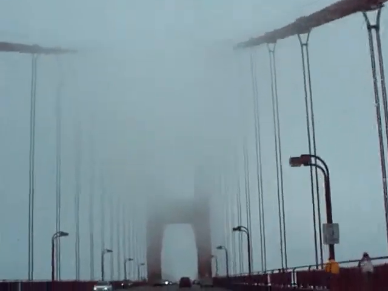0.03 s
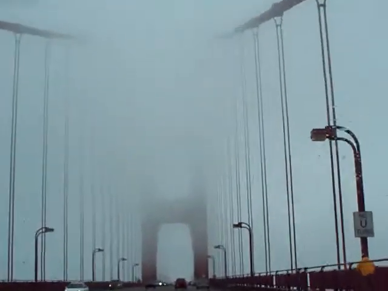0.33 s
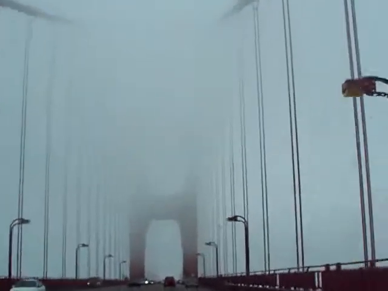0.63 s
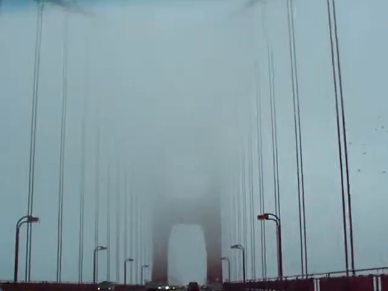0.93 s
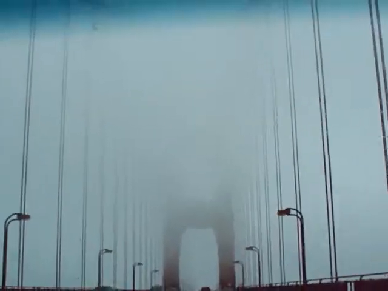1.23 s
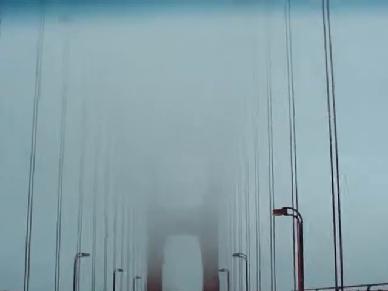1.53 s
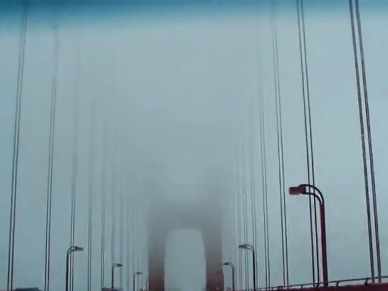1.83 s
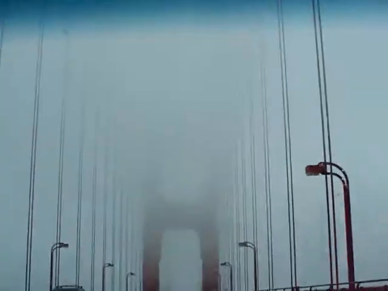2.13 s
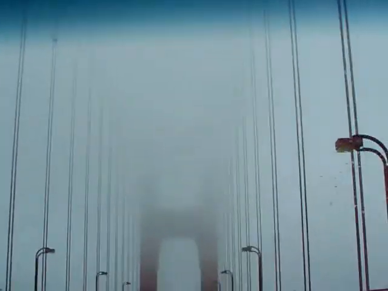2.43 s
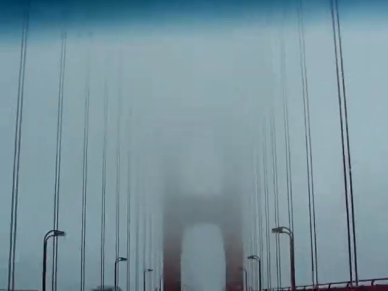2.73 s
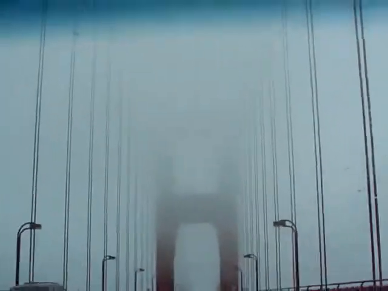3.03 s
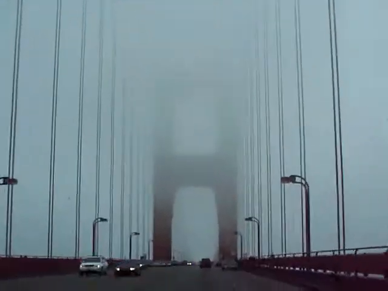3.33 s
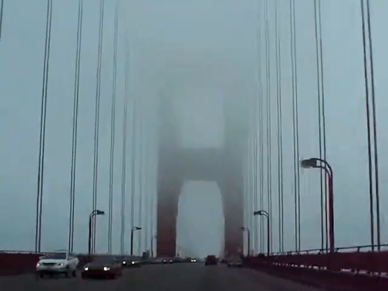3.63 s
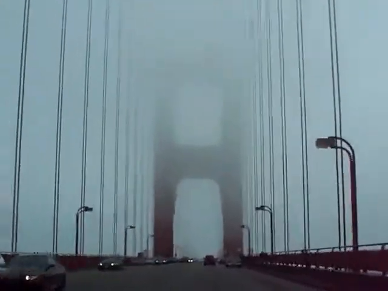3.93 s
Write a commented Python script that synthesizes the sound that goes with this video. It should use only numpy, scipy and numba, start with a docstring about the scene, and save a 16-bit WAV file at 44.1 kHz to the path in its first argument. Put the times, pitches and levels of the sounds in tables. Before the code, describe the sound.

Steady road rumble and wind are heard from inside a car driving over a bridge. Dull bumps and small, close rattles come as the noise rises, and the engine hums underneath, a little stronger toward the end.

```python
"""Tyre roar and wind fill the cabin of a car crossing a bridge at steady speed, swelling near one second.
Rough patches shake the body and thud through the suspension, and something loose ticks close by.
The engine drones underneath, and air whistles faintly through a gap. Heard from inside the cabin,
on a small camera's microphone whose gain control ducks briefly after the sharpest knocks."""
import sys
import numpy as np
from scipy import signal
from scipy.fft import rfft, irfft
from scipy.io import wavfile
from scipy.ndimage import uniform_filter1d
from numba import njit

SR = 44100
rng = np.random.default_rng(int(sys.argv[2]) if len(sys.argv) > 2 else 0)


def put_to_file(sound):
    """Save the sound as 16-bit audio at rate SR, in the file named by the first command-line argument."""
    columns = np.atleast_2d(sound).T  # one column per channel
    safe = np.clip(columns, -1, 1)
    whole_steps = np.round(safe * 32767)
    wavfile.write(sys.argv[1], SR, whole_steps.astype(np.int16))


N = 176400

# rush of tyres and wind in the cabin (t/s, level/dB)
RUSH_LEVEL = [(0, -46), (.3, -48), (.48, -45), (.68, -45), (.82, -39.5), (.96, -36.5), (1.05, -38),
              (1.11, -33.5), (1.18, -38), (1.39, -38), (1.5, -40.5), (1.75, -38), (1.95, -39), (2.015, -43),
              (2.045, -40), (2.5, -40), (2.68, -38), (2.83, -40.5), (3.1, -35), (3.25, -35), (3.35, -32),
              (3.44, -35), (3.51, -34.5), (3.58, -38.5), (4, -37.5)]


def rush():
    """Tyres and wind heard through the glass, with narrow resonances of tyres and cabin."""
    spectrum = [(200, -22.5), (450, -1.5), (620, 0), (795, 3.5), (870, -2.5), (1200, -5.5), (1420, -7),
                (1600, -8.5), (1850, -10.5), (2500, -19.5), (3100, -24.5), (3900, -38), (5000, -65.5)]  # the broad roar (f/Hz, level/dB)
    resonances = [(771, 79, -15), (1418, 42, -17), (1900, 30, -29)]  # (f/Hz, width/Hz, level/dB relative to the roar)
    roar = noise(spectrum, flicker_db=0.83)
    ringing = sum(undb(db) * ring(hz, width) for hz, width, db in resonances)
    return (roar + ringing) * undb(curve(RUSH_LEVEL))


def rumble():
    """The road rumbles up through the floor."""
    spectrum = [(20, -14), (55, -11.5), (85, -6), (140, -1), (195, -6.5), (230, 1), (260, -3.5), (305, 2),
                (400, 1), (480, -8), (650, -13.5), (1000, -22.5), (2000, -65)]  # colour of the rumble (f/Hz, level/dB)
    level = [(0, -41.5), (.68, -44.5), (.85, -36), (1.13, -35), (1.5, -39), (1.8, -37.5), (2.03, -40),
             (2.6, -36.5), (2.95, -39), (3.12, -38), (3.36, -35), (3.57, -41), (4, -36.5)]  # its swells (t/s, level/dB)
    return noise(spectrum, flicker_db=1.0) * undb(curve(level))


def bumps():
    """Each rough patch shakes the body for a moment, and the tyres slap on it."""
    patches = [(.93, -37.5, 1, -9), (1.112, -31, 0.62, 1), (1.14, -35, 1.04, 0), (1.294, -40, 1.9, -15),
               (1.44, -37, 1, -5), (1.792, -32, 1.5, -9), (1.925, -32, 0.64, -11), (2.21, -43.5, 1.2, -4),
               (2.427, -32.5, 1.7, -4), (2.655, -39.5, 1.1, -3), (2.776, -38, 0.91, -1),
               (3.075, -33, 1.05, 0.5), (3.119, -32.5, 1.7, -7), (3.2, -32.5, 1.6, -2.5),
               (3.294, -34.5, 2.4, -4.5), (3.4, -36, 0.82, -1), (3.519, -31.5, 0.86, 0),
               (3.62, -32.5, 1.2, -5), (3.721, -30.5, 1.5, -4), (3.845, -31.5, 1, -12),
               (3.974, -31, 1.1, -3)]  # (t/s, body level/dB, length factor, slap level/dB relative to the body)
    body_spectrum = [(40, -23), (90, 0.5), (130, -1.5), (190, 2), (250, 1), (300, 7), (390, 8.5), (520, -5),
                     (780, -12), (1000, -23), (2000, -50.5)]  # the body's answer to a bump (f/Hz, level/dB)
    slap_spectrum = [(300, -24.5), (550, -6), (760, 5), (950, -8.5), (1800, -13), (3500, -47.5)]  # the tyres' slap (f/Hz, level/dB)
    rise_s, fall_s = 0.01, 0.0079  # at length factor 1
    t = np.arange(N) / SR
    body_power = slap_power = 0
    for at, db, length, slap_db in patches:
        width = length * np.where(t < at, rise_s, fall_s)
        power = undb(db) ** 2 * np.exp(-((t - at) / width) ** 2)
        body_power += power
        slap_power += power * undb(slap_db) ** 2
    body = np.sqrt(body_power) * noise(body_spectrum, flicker_db=0.5)
    slap = np.sqrt(slap_power) * noise(slap_spectrum, flicker_db=0.0)
    return body + slap


def thuds():
    """The suspension takes a blow, and the cabin booms for a few cycles."""
    blows = [(1.115, -30, 137.2), (1.30, -29, 116), (1.445, -42, 148), (1.92, -35, 128)]  # (t/s, level/dB, f/Hz)
    t, half_length_s = np.arange(N) / SR, 0.019
    out = np.zeros(N)
    for at, db, hz in blows:
        envelope = undb(db) * np.exp(-((t - at) / half_length_s) ** 2)
        out += envelope * np.sin(2 * np.pi * (hz * t + rng.random()))
    return out


def add_tick(out, at, knock_db, edge_db, edge_hz, sign, rebound):
    """One tick: a dull push under a millisecond long, with a bright edge that rebounds once."""
    knock_s, edge_s, latest_rebound_s = 0.00028, 0.00015, 0.0006
    t = np.arange(-200, 200) / SR
    spread = (t / knock_s) ** 2
    knock = np.exp(-spread / 2) - np.exp(-spread / 32) / 4  # a push inside a wider, shallow pull
    snap = lambda s: np.exp(-(s / edge_s) ** 2) * np.cos(2 * np.pi * edge_hz * s)
    edge = snap(t) + undb(-7) * snap(t - latest_rebound_s * (1 + rebound) / 2)
    edge = signal.sosfiltfilt(signal.butter(6, 4200, "high", fs=SR, output="sos"), edge)
    start = int(np.clip(at * SR - len(t) // 2, 0, N - len(t)))
    out[start:start + len(t)] += sign * (undb(knock_db) * knock + undb(edge_db) * edge)


def rattle():
    """Something loose close by: clear ticks, and faint chatter that grows denser and louder with the rush."""
    ticks = [(0.736, -38, -49, 6600), (.793, -24, -49, 7100), (0.823, -19, -53, 6300),
             (.835, -22, -46, 5960), (0.854, -14.5, -43, 6000), (1.01, -16.5, -45, 6330),
             (1.086, -38, -48, 6500), (1.119, -14, -41.5, 6400), (1.135, -24, -42, 5600),
             (1.152, -14.5, -38, 6400), (1.244, -16, -40.5, 6950), (1.295, -21, -43, 5700),
             (1.303, -25, -43.5, 6200), (1.449, -14, -43.5, 6000), (1.873, -32, -42, 5400),
             (1.930, -16, -38.5, 5960), (1.975, -16.5, -41.5, 6400), (1.996, -32, -54, 6600),
             (2.027, -44, -50, 6400), (2.304, -18, -44, 7100), (2.453, -16, -46, 6850),
             (2.504, -24, -58, 5500), (2.519, -35, -39.5, 6800), (2.78, -25, -45.5, 6100),
             (2.838, -40, -49, 6700), (2.951, -30, -42, 5700), (3.002, -28, -42.5, 5450),
             (3.022, -30, -50.5, 6000), (3.246, -27, -45, 5950), (3.344, -15, -40, 7260),
             (3.378, -25, -44, 5400), (3.399, -21, -42, 7000), (3.405, -14, -39, 6200),
             (3.477, -17.5, -42, 5760), (3.536, -15, -40.5, 6600), (3.551, -29, -41, 5850),
             (3.6, -31, -44, 6700), (3.622, -16.5, -47, 6500), (3.642, -20, -40, 5600),
             (3.75, -15, -41, 5840), (3.797, -20, -41, 5700), (3.814, -36, -46, 5800),
             (3.848, -16, -43, 6900), (3.910, -23, -42, 5400), (3.982, -36, -40, 7200)]  # the clear ticks (t/s, knock level/dB, edge level/dB, edge f/Hz)
    peak_chatter_per_s, still_below_db = 45, -45.5
    out, rush_db = np.zeros(N), curve(RUSH_LEVEL)
    for tick, (side, rebound) in zip(ticks, rng.random((len(ticks), 2))):
        add_tick(out, *tick, np.sign(side - .5), rebound)
    shaking = (rush_db - still_below_db) / (rush_db.max() - still_below_db)
    for when, size, pitch, side, rebound, grip in rng.random((int(peak_chatter_per_s * N / SR), 6)):
        i = int(when * N)
        if grip < shaking[i]:
            edge_db = rush_db[i] - 12.5 + 2.5 * (2 * size - 1)
            edge_hz = 5700 * (1 + .4 * (pitch - .5))
            add_tick(out, when * N / SR, edge_db + 12, edge_db, edge_hz, np.sign(side - .5), rebound)
    return out


def engine():
    """Clean orders of the shaft rate; the third booms in the cabin, and each wavers a little."""
    shaft_rate = [(0, 39.4), (.9, 39.8), (2.3, 40.1), (3.1, 40.2), (4, 40.2)]  # turns of the shaft per second (t/s, f/Hz)
    orders = [(2, -13.5), (3, -0.5), (6, -10), (9, -9)]  # engine orders (multiple of the shaft rate, level/dB)
    level = [(0, -50), (.35, -63), (.8, -42), (1.4, -44.5), (2.0, -47), (2.8, -43), (3.15, -36.5),
             (3.5, -35), (4, -36.5)]  # the drone in the cabin (t/s, level/dB)
    turns = np.cumsum(curve(shaft_rate) * (1 + .001 * walk(6))) / SR
    drone = np.zeros(N)
    for order, db in orders:
        drone += undb(db + 1.2 * walk(12)) * np.sin(2 * np.pi * (round(order) * turns + rng.random()))
    return np.sqrt(2) * drone * undb(curve(level))


def gusts():
    """Gusts brighten the rush at the crests of its swells."""
    spectrum = [(700, -25.5), (1200, 2), (1550, 3.5), (2000, 1), (2600, -13), (3600, -25.5), (4500, -49)]  # colour of a gust (f/Hz, level/dB)
    crests = [(0.82, -47, 0.031), (0.955, -50, 0.058), (3.352, -43.5, 0.067)]  # (t/s, level/dB, half length/s)
    t = np.arange(N) / SR
    envelope = sum(undb(db) * np.exp(-((t - at) / width) ** 2 / 2) for at, db, width in crests)
    return noise(spectrum, flicker_db=2.0) * envelope


def hiss():
    """Fine wind hiss from outside the glass."""
    spectrum = [(2500, -19), (4000, -7.5), (4800, 0), (6000, 1.5), (7500, -2), (8400, -8), (9300, -15)]  # colour of the hiss (f/Hz, level/dB)
    level = [(0, -77.5), (.68, -76), (.85, -69.5), (1.13, -67.5), (1.2, -69), (1.5, -71), (1.8, -70.5),
             (2.3, -71), (2.8, -70.5), (3.1, -66.5), (3.35, -66), (3.6, -68), (4, -67.5)]  # its swells (t/s, level/dB)
    return noise(spectrum, flicker_db=1.0) * undb(curve(level))


def whistle():
    """Air through a gap: a thin, unsteady tone far in the background."""
    level = [(0, -84), (.12, -93), (.17, -82), (.44, -80), (.52, -95), (4, -110)]  # strength of the whistle (t/s, level/dB)
    return ring(hz=5850, width_hz=280) * undb(curve(level))


def undb(db):
    """Decibels to gain."""
    return 10 ** (np.asarray(db) / 20)


def curve(rows):
    """Straight lines through (t/s, value) rows."""
    return np.interp(np.arange(N) / SR, *np.array(rows, float).T)


def walk(rate):
    """Random levels held 1 / rate s and smoothed twice; spread near 1."""
    hold = max(int(SR / rate), 2)
    steps = rng.standard_normal(1024)[np.arange(N) // hold % 1024]
    return 1.3 * uniform_filter1d(uniform_filter1d(steps, hold), hold)


def noise(colour, flicker_db):
    """Noise of rms 1, shaped by (f/Hz, level/dB) rows; each octave flickers on its own."""
    octave = np.log2(np.maximum(np.arange(N // 2 + 1) * SR / N, 1))
    hz, db = np.array(colour, float).T
    spectrum = rfft(rng.standard_normal(N)) * undb(np.interp(octave, np.log2(hz), db))
    out = np.zeros(N)
    for centre in range(4, 15):  # octaves from 16 Hz to 16 kHz
        share = np.maximum(1 - abs(octave - centre), 0)
        out += irfft(spectrum * share, N) * undb(flicker_db * walk(21.79))
    return out / np.std(out)


def ring(hz, width_hz):
    """A narrow resonance stirred by noise; rms near 1."""
    phase = 2 * np.pi * hz * np.arange(N) / SR
    return walk(width_hz) * np.cos(phase) + walk(width_hz) * np.sin(phase)


@njit
def peak_level(x, attack_s, release_s):
    """Peak level of a sound, quick to rise and slow to fall."""
    attack, release = 1 - np.exp(-1 / (attack_s * SR)), 1 - np.exp(-1 / (release_s * SR))
    out, level = np.empty(len(x)), 0.
    for i in range(len(x)):
        level += (abs(x[i]) - level) * (attack if abs(x[i]) > level else release)
        out[i] = level
    return out


def scene():
    """Everything that reaches the microphone in the cabin, in mono."""
    return (rumble() + rush() + hiss() + gusts() + bumps() + engine() + whistle() + rattle() + thuds())[None]


def record(dry):
    """The microphone's gain control ducks after peaks; the top treble is cut."""
    threshold_db, ratio = -21, 3
    peak = peak_level(dry[0], attack_s=0.0001, release_s=0.24)
    gain = np.maximum(peak / undb(threshold_db), 1) ** (1 / ratio - 1)
    ducked = dry * uniform_filter1d(gain, size=24)
    softened = signal.sosfilt(signal.butter(10, 8800, fs=SR, output="sos"), ducked)
    return signal.sosfilt(signal.ellip(8, .2, 70, 9400, fs=SR, output="sos"), softened)


dry = scene()
out = record(dry)
put_to_file(out)
```